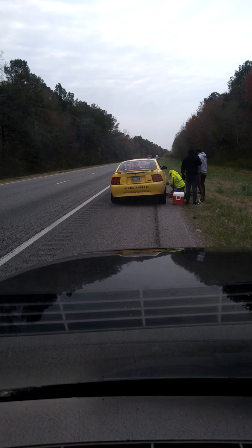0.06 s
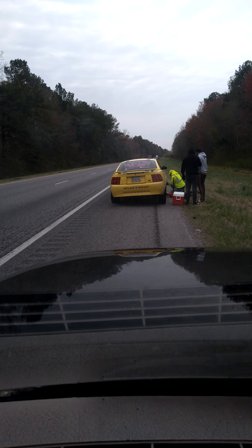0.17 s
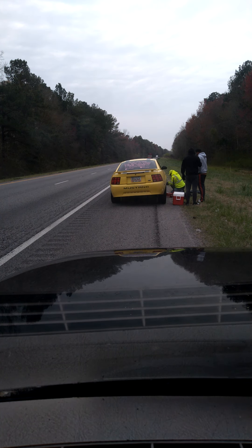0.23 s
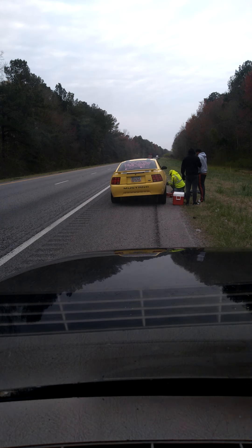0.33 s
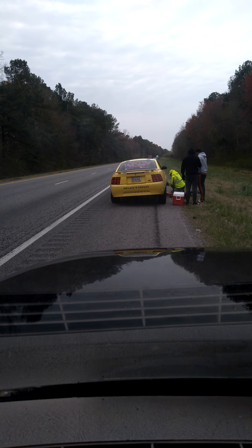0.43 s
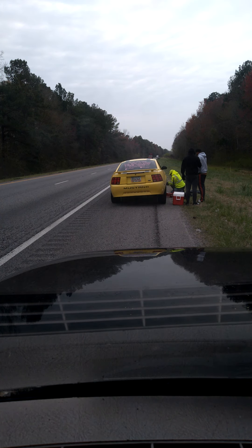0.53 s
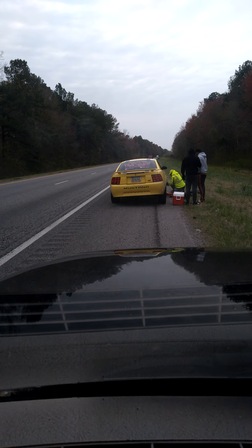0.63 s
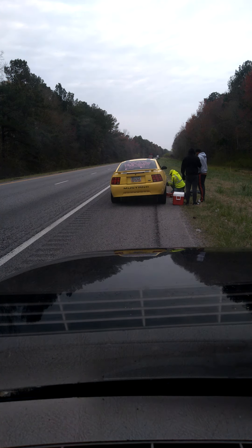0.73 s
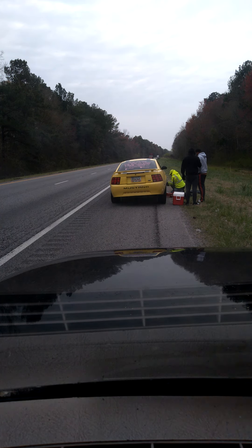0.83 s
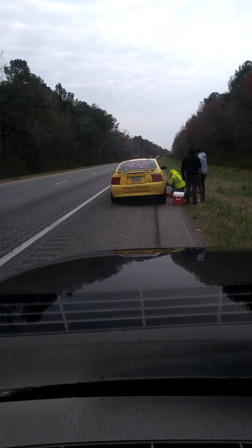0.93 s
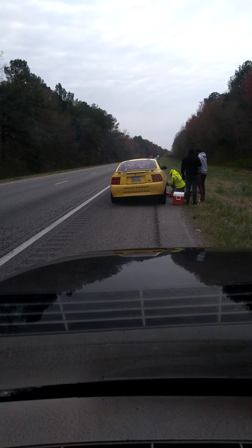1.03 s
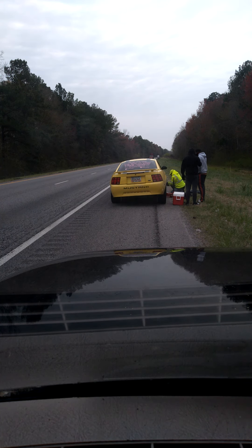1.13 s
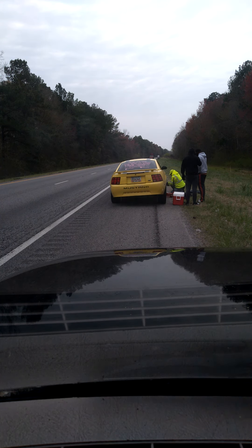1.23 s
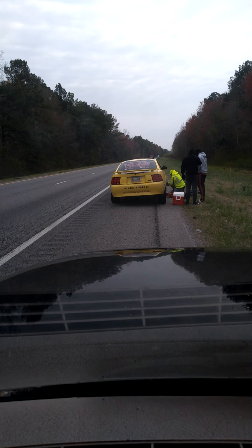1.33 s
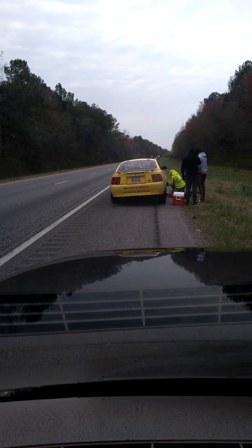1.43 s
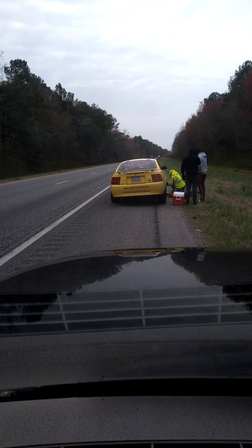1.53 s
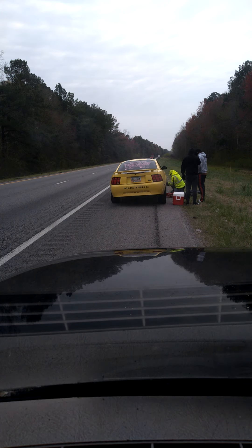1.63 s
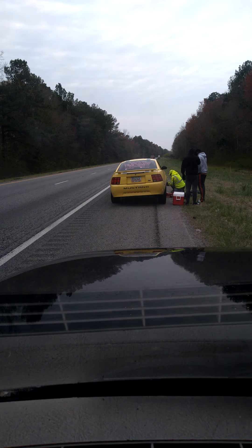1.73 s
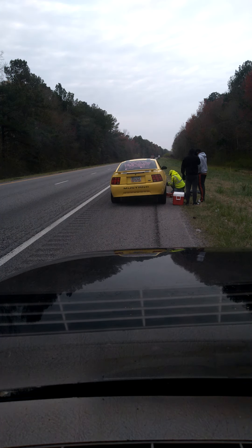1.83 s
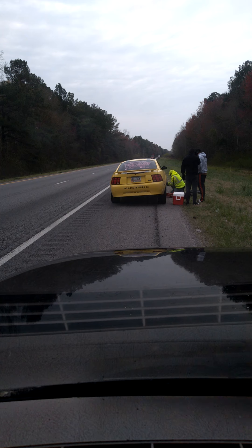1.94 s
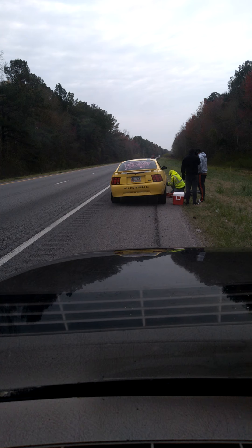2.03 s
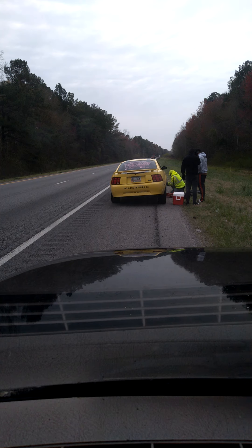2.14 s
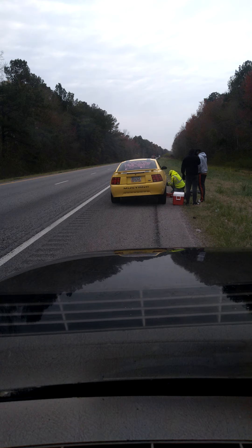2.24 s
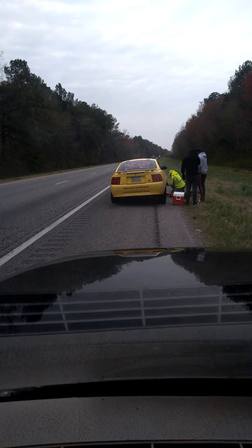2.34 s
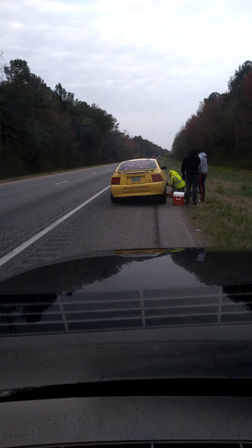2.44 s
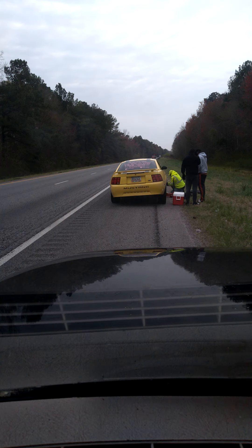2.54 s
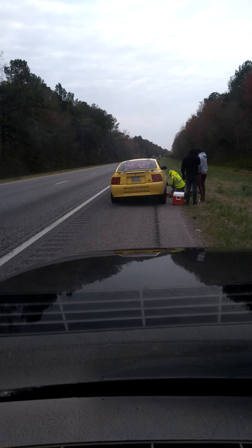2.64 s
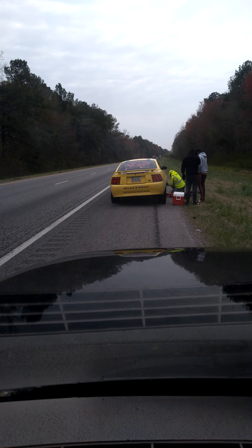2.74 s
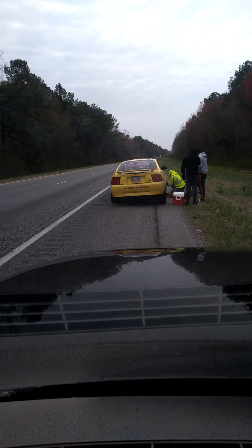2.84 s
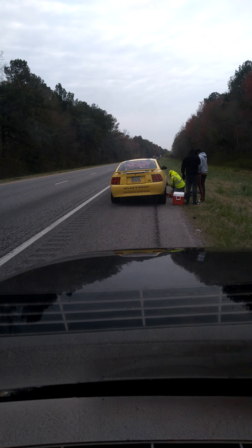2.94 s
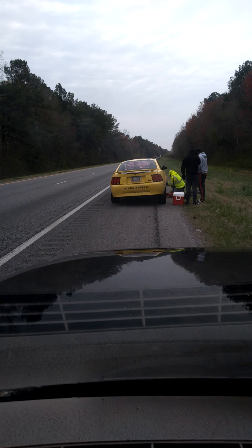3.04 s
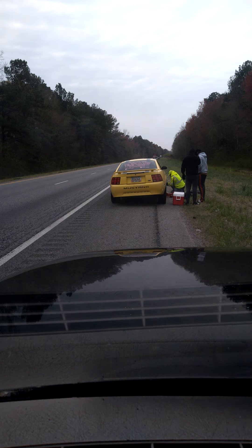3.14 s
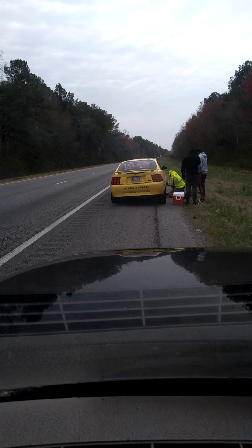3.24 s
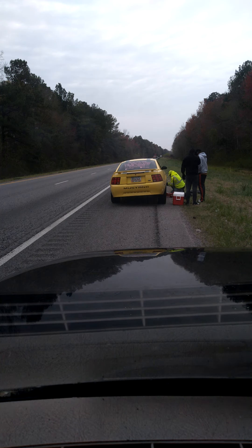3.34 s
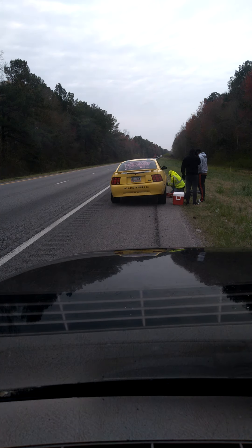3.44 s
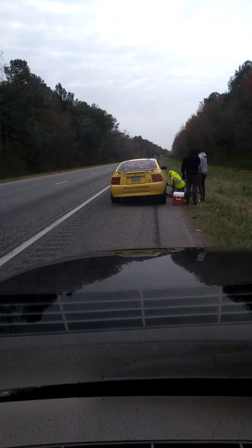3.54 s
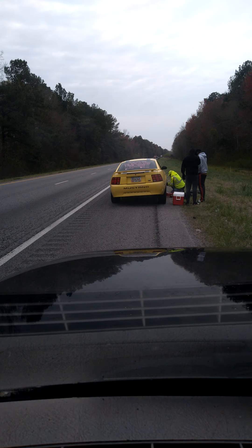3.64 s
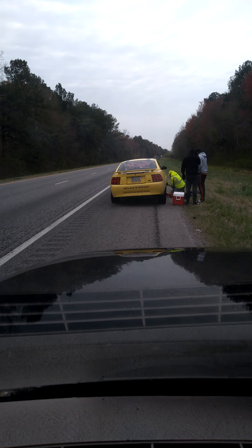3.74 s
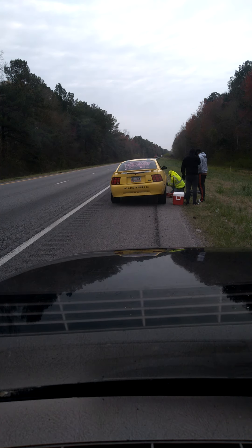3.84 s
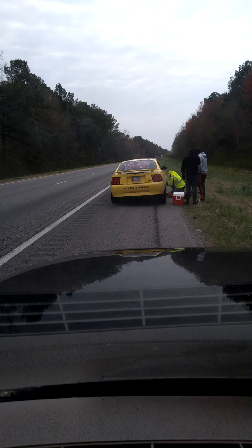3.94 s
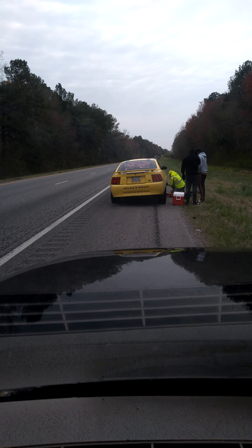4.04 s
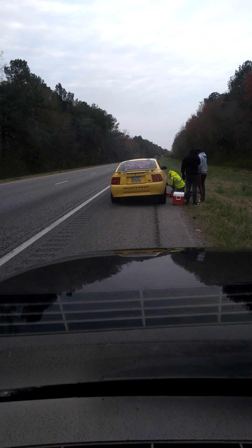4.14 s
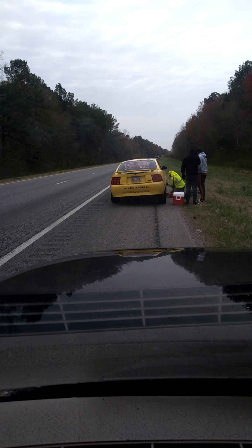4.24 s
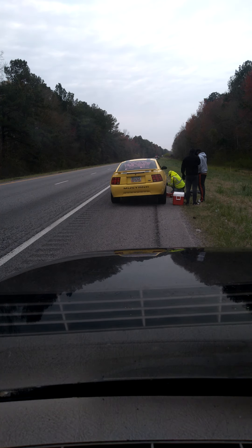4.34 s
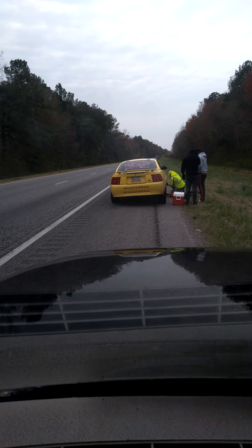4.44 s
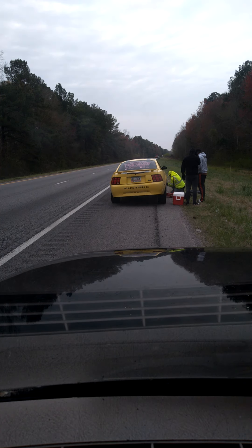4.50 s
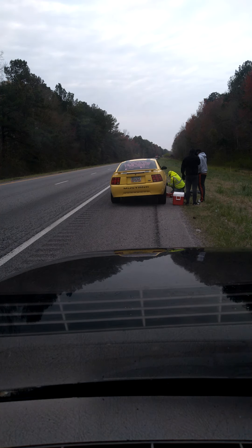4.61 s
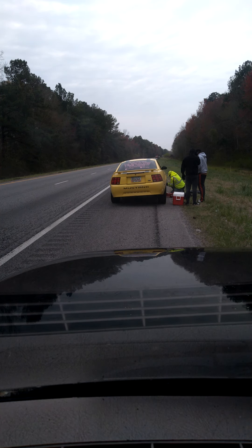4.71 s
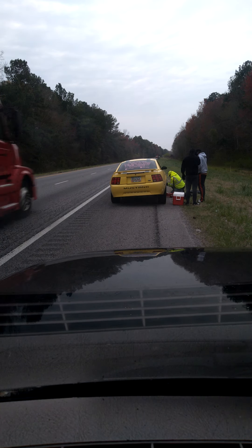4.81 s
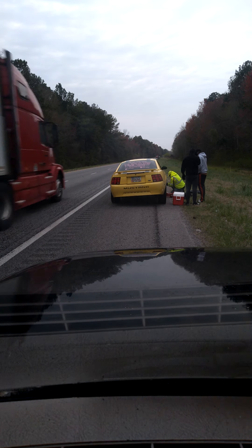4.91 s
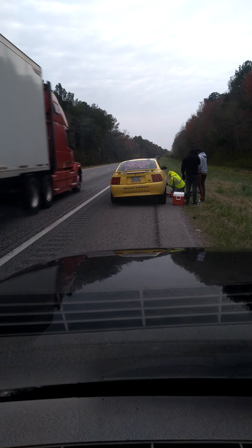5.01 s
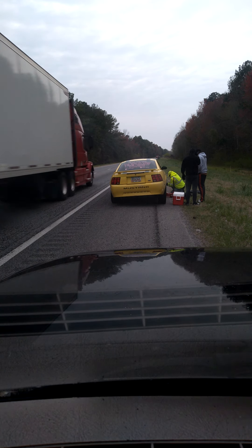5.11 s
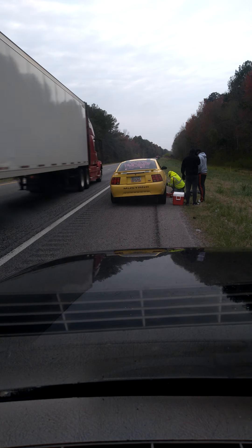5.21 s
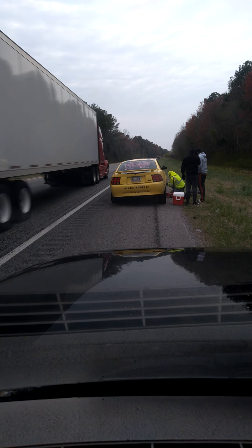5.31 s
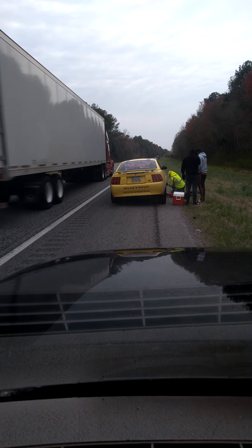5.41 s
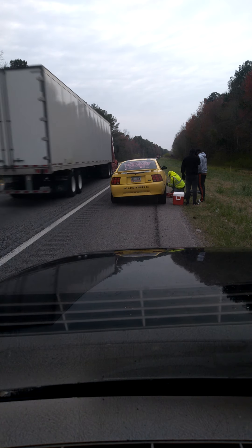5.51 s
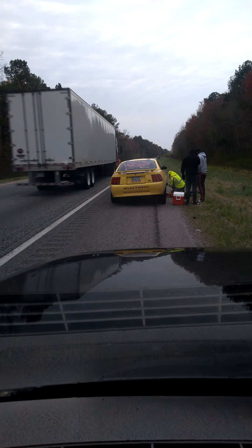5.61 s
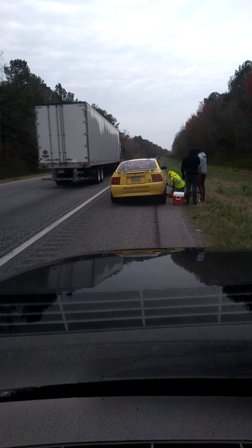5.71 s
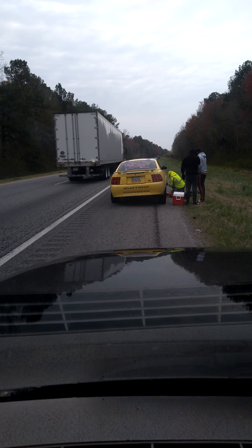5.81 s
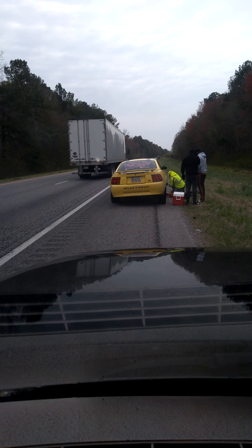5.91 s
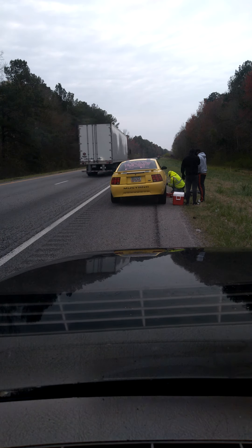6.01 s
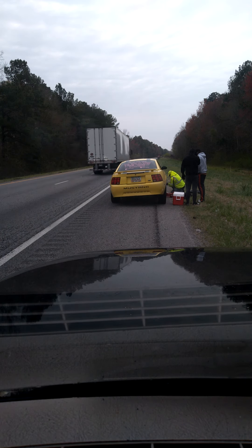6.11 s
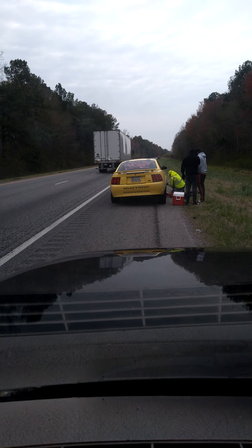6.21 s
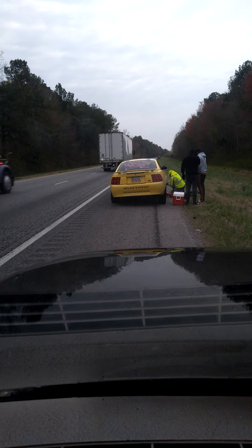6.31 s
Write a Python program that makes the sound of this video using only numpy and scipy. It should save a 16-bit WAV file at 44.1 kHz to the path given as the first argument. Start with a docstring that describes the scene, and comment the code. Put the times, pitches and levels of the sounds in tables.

```python
"""A swelling road noise, then a tractor-trailer and the traffic behind it rush past on the left,
heard inside a car idling on a highway shoulder, windows shut. Engines and tyres boom through the
body into the cabin's resonances; tyre hiss leaks in at the door seals. In the car the flasher
relay ticks, something small rattles fast and the fan blows softly."""
import sys
import numpy as np
from scipy import signal
from scipy.fft import rfft, irfft, next_fast_len
from scipy.io import wavfile
from scipy.ndimage import uniform_filter1d, map_coordinates

SR = 44100
rng = np.random.default_rng(int(sys.argv[2]) if len(sys.argv) > 2 else 0)


def master(y):
    """Save y as 16-bit WAV."""
    cut = np.clip(np.atleast_2d(y).T, -1, 1)
    pcm = np.round(cut * 32767)  # scale
    wavfile.write(sys.argv[1], SR, pcm.astype(np.int16))


N = 280476


def body():
    """Engines and tyres shake the panels and drive the cabin air: a long climb, a swell per axle set."""
    # Cabin air modes. Each row: centre in Hz, width in Hz, relative level in dB.
    cabin_modes = [(51.7, 8.7, -16), (77.3, 15, -6.5), (89.5, 41, -2), (173.5, 22, -1), (192.7, 11, -0.5),
                   (222.8, 14.5, 4), (258, 48, -4.5), (331, 47, -2), (408.7, 14, -1), (461.8, 19, -0.5),
                   (507, 13, -1), (575, 18, -4.5), (613.5, 24, 0), (647, 20, -2), (813, 48, -13),
                   (949, 17, -11)]
    # Axle sets, two on the truck, two behind it. Each row: time in s, half-width in s,
    # then boom, drone, hum and roar in dB.
    axles = [(4.67, .35, -36, -25, -20, -21.5), (5.03, 0.22, -34, -22.5, -21.5, -21),
             (5.83, 0.25, -30, -23, -21.5, -23.5), (6.15, 0.3, -31.5, -24.5, -22, -25)]
    # Boom of the approach. Each row: time in s, relative level in dB.
    far_boom = [(0.0, -58), (0.06, -64.5), (1.53, -55), (1.62, -67), (1.96, -56), (2.98, -46),
                (3.19, -54.5), (3.51, -47), (3.58, -38), (3.9, -49.5), (4.16, -32), (4.3, -33)]

    def cabin(lo_hz, hi_hz, patchy_db):
        return noise(lambda hz: resonances(cabin_modes, hz) * band(hz, lo_hz, hi_hz, order=7), patchy_db)

    near_boom, near_drone, near_hum, near_roar = passing(axles, BODY_FADE_DB)
    throb_db = 3 * np.cos(2 * np.pi * (clock() - 1.89) / 0.454) * (1 - ramp(2.6, 0.4))
    far_drone = approach(-42.5, far_db_per_s=7.9, near_db_per_s=6.94) * amp(throb_db)
    far_hum = approach(-43, far_db_per_s=9.7, near_db_per_s=3.3)
    far_roar = approach(-48.5, far_db_per_s=22, near_db_per_s=6.9)
    boom = together([near_boom, amp(curve(far_boom) + 1)]) * amp(0.85 * wobble(10))
    boom = boom * cabin(51.6, 136, patchy_db=0.1)
    drone = together([near_drone, far_drone]) * amp(0.57 * wobble(12))
    drone = drone * cabin(158.7, 266, patchy_db=-0.5)
    # Hum and roar reach higher as the traffic nears.
    hum = blend(cabin(292, 420, patchy_db=2), cabin(275, 494, patchy_db=1.7), ramp(0.79, 2.04))
    roar = blend(cabin(555, 834, patchy_db=0), cabin(550, 1016, patchy_db=0), ramp(2.95, 1.32))
    hum *= together([near_hum, far_hum, swell(1.36, 0.28, db=-53)]) * amp(0.65 * wobble(23))
    roar *= together([near_roar, far_roar, amp(-72)]) * amp(0.5 * wobble(20))
    # Faint throbbing sub-bass, barely audible.
    far_rumble = swell(3, 2, db=-45.5 + throb_db) * whistle(0, width_hz=8.2)[0]
    return boom + drone + far_rumble + hum + panned(roar, left_db=-0.4)


def engines():
    """Own idle, plus passing firing notes and tyre whine that swell, drop in pitch and linger."""
    # Truck engine, next vehicle's exhaust, tyre whine. Each row: abreast in s, glide time in s, pitch
    # in Hz, Doppler share, peak in s, half-width in s, peak in dB, lingering in dB, octave in dB.
    notes = [(4.65, 0.246, 101, 0.037, 5.37, 0.42, -28.5, -44, -8.5),
             (5.97, .2, 88, .115, 5.98, 0.12, -18.5, -29.5, -2.5),
             (5.2, 0.508, 232, .035, 6.02, 1, -32, -42, -11)]
    out = amp(-61) * tone(hz=69.2, octave_db=-51, waver=0.017, flutter_db=4.5)  # idle
    for abreast_s, glide_s, hz, share, peak_s, half_width_s, db, linger_db, octave_db in notes:
        gain = together([swell(peak_s, half_width_s, db), amp(linger_db) * ramp(peak_s, half_width_s)])
        pitch_hz = doppler(abreast_s, glide_s, hz, share)
        out += gain * tone(pitch_hz, octave_db, waver=0.0058, flutter_db=2)
    return out


def seals():
    """Tyre hiss leaks in at the door seals on each pass; a gap on the right sings in the wake."""
    # Truck, then traffic behind. Each row: time in s, half-width in s, then rush, hiss and fizz in dB.
    passes = [(4.53, 0.28, -29.5, -30, -38), (5.89, 0.22, -23.5, -26.5, -36)]
    # Tyre noise, mid and treble. Each row: frequency in Hz, relative density in dB.
    rush_spectrum = [(600, -27), (850, -8.5), (964, 1.5), (1130, -6), (1340, 2), (1560, -3), (1800, -2),
                     (2150, -7), (2600, -5.5), (2950, -7.5), (3300, -13.5), (4500, -20), (6000, -43)]
    hiss_spectrum = [(1940, -51), (3300, -6), (4460, -4), (9340, -0.5), (10900, -5), (14900, -10.5),
                     (15800, -27)]
    # Gusts at the gap. Each row: time in s, half-width in s, level in dB, pitch in Hz, rise in Hz/s.
    gusts = [(4.5, 0.37, -41, 9390, 250.7), (6.02, 0.22, -32.5, 9360, 1150)]

    def leak(spectrum, lo_hz, hi_hz, patchy_db):
        return noise(lambda hz: shape(spectrum)(hz) * band(hz, lo_hz, hi_hz, order=6), patchy_db)

    rush_gain, hiss_gain, fizz_gain = passing(passes, SEAL_FADE_DB)
    rush_gain = np.interp(clock() + 0.069, clock(), rush_gain)  # rush leads hiss
    far_s = np.maximum(3.65 - clock(), 0)  # time until near; distance takes the treble first
    near_rush = noise(shape(rush_spectrum), patchy_db=1.5)
    far_rush = leak(rush_spectrum, 1440, 3150, patchy_db=2)
    rush = rush_gain * amp(-1.8 * far_s) * blend(far_rush, near_rush, ramp(3.09, 0.69))
    hiss = glass(leak(hiss_spectrum, 2500, 10200, patchy_db=1.5), spread_s=0.003)
    hiss *= hiss_gain * amp(-4.2 * far_s)
    fizz = fizz_gain * amp(-11 * far_s) * leak(hiss_spectrum, 11000, 20000, patchy_db=-1)
    gap = 0
    for peak_s, half_width_s, db, hz, rise_hz_per_s in gusts:
        pitch_hz = hz + rise_hz_per_s * np.clip(clock() - peak_s, -0.6, 0.6)
        gain = swell(peak_s, half_width_s, db, SEAL_FADE_DB) * amp(-12 * far_s)
        gap += gain * whistle(pitch_hz, width_hz=690)
    rumble = swell(6.5, 0.52, db=-28.5) * whistle(0, width_hz=220)  # low, with the second pass
    return panned(rush, -1.1) + panned(rumble, -2) + panned(hiss, 0.5) + panned(fizz, 1) + panned(gap, -16)


def treads():
    """Tyre treads sing in thin bands that swell and fall in pitch going by."""
    # Tread bands. Each row: abreast in s, glide time in s, pitch in Hz, Doppler share, peak in s,
    # half-width in s, level in dB, width in Hz.
    tread_bands = [(4.5, .3, 4405, .02, 3.6, .9, -57, 35), (4.5, .3, 5260, .02, 3.8, 0.96, -55.5, 70),
                   (4.5, .3, 6200, .02, 3.7, .9, -57, 40), (4.501, .3, 1800, .055, 4.34, 0.66, -42.5, 65),
                   (6.029, .16, 2847, .1, 6.07, 0.21, -40, 51),
                   (6.03, 0.17, 3303, 0.062, 5.96, 0.29, -39.5, 31)]
    return sum(swell(peak_s, half_width_s, db) * whistle(doppler(abreast_s, glide_s, hz, share), width_hz)
               for abreast_s, glide_s, hz, share, peak_s, half_width_s, db, width_hz in tread_bands)


def relay():
    """The flasher's armature snaps shut and drops back with a duller knock; the trim ticks once."""
    # Armature snap. Each row: frequency in Hz, relative density in dB.
    snap_spectrum = [(600, -38), (1500, 2), (2500, -9.5), (3600, -2), (4700, -1), (5600, -5.5), (8500, 2.5),
                     (10200, 4), (13000, -3), (15800, -9)]
    # Housing modes on closing and release. Each row: frequency in Hz, relative level in dB, T60 in s.
    closing_modes = [(930, -8, 0.046), (1062, -14, 0.092), (1200, -8.5, 0.043), (1310, 1.5, 0.035),
                     (1430, -20, 0.022), (4730, -8, 0.037)]
    release_modes = [(793, -8.5, .08), (892, -5, 0.084), (1090, -4.5, 0.096), (1190, -7.5, .08),
                     (1295, -4.5, 0.073), (1580, -8, 0.079)]
    # Trim tick. Each row: time in s, level in dB.
    trim_ticks = [(5.4166, -31)]
    period_s, held_s = 0.7002, 0.3668
    shut_s = np.arange(0.0895, N / SR, period_s)
    release_s = shut_s + held_s
    # The phone's treble opens late, so the first two clicks sound duller.
    phone_db = lambda times_s: -8 * (times_s < 0.7)
    snap = noise(shape(snap_spectrum), patchy_db=2.5)
    on = snap * strikes(shut_s, -39 + phone_db(shut_s), t60_s=0.08, tail_db=0.5, tail_t60_s=0.14)
    on += ringing(shut_s, -39, closing_modes)
    off = snap * strikes(release_s, -44.5 + phone_db(release_s), t60_s=0.095, tail_db=0, tail_t60_s=0.16)
    off += ringing(release_s, -44, release_modes)
    trim = snap * strikes(*np.transpose(trim_ticks), t60_s=0.04, tail_db=-5, tail_t60_s=0.12)
    return on + panned(off, left_db=3.5) + panned(trim, left_db=-3)


def rattle():
    """Something small and close starts as a hollow hiss, then ticks about forty times a second."""
    # Rattle level, entering in two steps. Each row: time in s, relative level in dB.
    levels = [(0, -87), (.44, -76), (.48, -56), (.71, -64.5), (.76, -52), (1.15, -48), (1.9, -49),
              (6.36, -44)]
    # Tick and hiss spectra. Each row: frequency in Hz, relative density in dB.
    tick_spectrum = [(2000, -22), (2550, -0.5), (2870, 2.5), (3300, -10), (4000, -8), (5500, -3.5),
                     (9000, -4.5), (11500, 2), (12800, -7), (14000, -9), (15800, -16)]
    hiss_spectrum = [(600, -34), (1000, -1), (1400, -2), (1600, 6.5), (1900, -0.5), (2250, -4), (2850, 2.5),
                     (3200, 3), (4000, -1.5), (5500, 1.5), (7500, 2.5), (9800, 5.5), (11500, -13),
                     (13000, -8), (15800, -21)]
    # Dashboard hollows. Each row: centre in Hz, width in Hz, relative level in dB.
    hollows = [(1840, 140, 3), (2880, 150, 1.5), (5350, 180, 0)]
    rate_hz = 39.75
    times_s = np.arange(0.018, N / SR, 1 / rate_hz)
    uneven_db = 1.8 * rng.standard_normal(len(times_s)) + 0.39 * (-1) ** np.arange(len(times_s))
    envelope = unit(strikes(times_s, uneven_db, t60_s=0.06, tail_db=-10, tail_t60_s=0.06))
    ticks = ramp(0.69, 0.04) * envelope * noise(shape(tick_spectrum), patchy_db=2)
    hollow = lambda hz: shape(hiss_spectrum)(hz) * np.hypot(1, resonances(hollows, hz))
    hiss = glass(noise(hollow, patchy_db=2), spread_s=0.004)
    return amp(curve(levels)) * (amp(-2) * ticks + amp(1.5) * hiss)


def fan():
    """The ventilation blows softly."""
    # Vent air. Each row: frequency in Hz, relative density in dB.
    air_spectrum = [(400, -25), (750, -8), (1050, 2), (1450, -2.5), (1800, 8), (2100, -9), (2900, -8),
                    (4000, -11), (5500, -14), (8600, -13), (10000, -35), (15000, -38)]
    return amp(-59.5) * noise(shape(air_spectrum), patchy_db=1.3)


BODY_FADE_DB, SEAL_FADE_DB = 60.5, 29.5  # loss per tenfold distance, via body and via seals


def swell(peak_s, half_width_s, db, fade_db=BODY_FADE_DB):
    """Gain of a source on a straight path, nearest at peak_s."""
    distance = np.hypot(1, (clock() - peak_s) / half_width_s)
    return amp(db - fade_db * np.log10(distance))


def passing(rows, fade_db):
    """One gain per level column: the swells of all rows together."""
    swells = [[swell(s, half_width_s, db, fade_db) for db in levels] for s, half_width_s, *levels in rows]
    return [together(layer) for layer in zip(*swells)]


def approach(db, far_db_per_s, near_db_per_s):
    """Gain of closing traffic: climbs to db at near_s, climbs on more slowly, then holds."""
    near_s, hold_s = 2.716, 4.6
    since_s = np.minimum(clock(), hold_s) - near_s
    return amp(db + np.where(since_s < 0, far_db_per_s, near_db_per_s) * since_s)


def doppler(abreast_s, glide_s, hz, share):
    """Pitch of a passing source: high coming, low leaving."""
    along_road = (clock() - abreast_s) / glide_s
    return hz * (1 - share * along_road / np.hypot(1, along_road))


def noise(response, patchy_db):
    """Stereo noise of rms 1 with drifting patches of gain."""
    # Cabin sound field. Each row: frequency in Hz, left-right correlation.
    correlation = [(100, 0.99), (220, 0.99), (380, .88), (700, 0.77), (950, 0.27), (1250, -0.64),
                   (2400, 0.059), (4400, -0.13), (15000, 0.12)]
    bins = signal.stft(rng.standard_normal((2, N)), nperseg=512)[2]
    patches = uniform_filter1d(rng.standard_normal(bins.shape[1:]), size=4, axis=0)
    patches = uniform_filter1d(patches, size=12, axis=1)
    pair = signal.istft(bins * amp(patchy_db * unit(patches)), nperseg=512)[1][:, :N]
    angle = lambda hz: np.arccos(np.clip(along(correlation, hz), -0.99, 0.997)) / 2
    mid, side = filtered(pair, lambda hz: response(hz) * np.array([np.cos(angle(hz)), np.sin(angle(hz))]))
    return unit(np.array([mid + side, mid - side]))


def tone(hz, octave_db, waver, flutter_db):
    """A slightly unsteady note with its octave."""
    phase = 2 * np.pi * np.cumsum(hz * (1 + waver * wobble(15))) / SR
    return amp(flutter_db * wobble(18)) * unit(np.sin(phase) + amp(octave_db) * np.sin(2 * phase))


def whistle(hz, width_hz):
    """Narrow stereo noise of rms 1 around a per-sample pitch; 0 gives a low rumble."""
    lowpass = lambda f: (f < 5 * width_hz) / (1 + (f / width_hz) ** 2)
    i, q = filtered(rng.standard_normal((2, 2, N)), lowpass)
    phase = 2 * np.pi * np.cumsum(hz) / SR
    return unit(i * np.cos(phase) + q * np.sin(phase))


def strikes(times_s, db, t60_s, tail_db, tail_t60_s):
    """Envelope of short clicks, each with a brief cabin reverberation."""
    t = np.arange(SR // 5) / SR
    click = (amp(-60 * t / t60_s) + amp(tail_db - 60 * t / tail_t60_s)) * (1 - np.exp(-t / 0.00084))
    blows = np.bincount(np.round(np.abs(times_s) * SR).astype(int), amp(db), N)[:N]
    return signal.fftconvolve(blows, click)[:N]


def ringing(times_s, level_db, modes):
    """Damped modes, struck at slightly new strengths each time."""
    t = np.arange(SR // 5) / SR
    out = np.zeros(N + len(t))
    for s in times_s:
        ring = sum(amp(db + rng.normal(0, 1) - 60 * t / t60_s)
                   * np.sin(2 * np.pi * (hz * t + rng.random())) for hz, db, t60_s in modes)
        out[round(s * SR):][:len(t)] += amp(level_db) * ring * (1 - np.exp(-t / 0.0018))
    return out[:N]


def glass(x, spread_s):
    """Add weak window reflections, different left and right; rms 1."""
    delays_s = rng.uniform(spread_s / 10, spread_s, (8, 2))
    echoes = [[np.pad(ch, (int(s * SR), 0))[:N] for ch, s in zip(x, pair)] for pair in delays_s]
    return unit(x + 0.11 * np.sum(np.array(echoes) * rng.choice([-1, 1], (8, 2, 1)), axis=0))


def resonances(modes, hz):
    """Gain of overlapping resonances, added in power."""
    return np.sqrt(sum(amp(db) ** 2 * (hz * width) ** 2 / ((centre ** 2 - hz ** 2) ** 2 + (hz * width) ** 2)
                       for centre, width, db in modes))


def band(hz, lo_hz, hi_hz, order):
    """Band-pass gain."""
    return 1 / np.sqrt((1 + (lo_hz / (hz + 1)) ** (2 * order)) * (1 + (hz / hi_hz) ** (2 * order)))


def filtered(x, response):
    """Apply a frequency response."""
    size = next_fast_len(N + SR // 2)
    return irfft(rfft(x, size) * response(np.fft.rfftfreq(size, 1 / SR)), size)[..., :N]


def along(points, hz):
    """Interpolate (Hz, value) points on a log axis."""
    knots_hz, values = np.transpose(points)
    return np.interp(np.log(hz + 1), np.log(knots_hz + 1), values)


def shape(points):
    """Response through (Hz, dB) points."""
    return lambda hz: amp(along(points, hz))


def curve(points):
    """Interpolate (s, value) points per sample."""
    return np.interp(clock(), *np.transpose(points))


def wobble(rate_hz):
    """Smooth random curve, rate_hz knots a second."""
    return map_coordinates(rng.standard_normal(int(N * rate_hz / SR) + 4), [np.arange(N) * rate_hz / SR])


def ramp(start_s, length_s):
    """Linear rise from 0 to 1."""
    return np.clip((clock() - start_s) / length_s, 0, 1)


def blend(a, b, share):
    """Equal-power crossfade from a to b."""
    return (1 - share) ** 0.5 * a + share ** 0.5 * b


def together(gains):
    """Gains added in power."""
    return np.sqrt(sum(g ** 2 for g in gains))


def panned(x, left_db):
    """Set left over right by left_db."""
    return x * amp([[left_db / 2], [-left_db / 2]])


def clock():
    """Sample times in s."""
    return np.arange(N) / SR


def amp(db):
    """Decibels to gain."""
    return 10 ** (np.asarray(db) / 20)


def unit(x):
    """Scale to rms 1."""
    return x / np.sqrt(np.mean(x ** 2) + 1e-20)


def scene():
    """Everything heard from the front seat."""
    return body() + engines() + seals() + treads() + fan() + rattle() + relay()


def record(dry):
    """The phone drops the deepest bass and everything above its band limit."""
    return filtered(dry, lambda hz: band(hz, lo_hz=29, hi_hz=SR, order=2) * (hz < 15850))


dry = scene()
out = record(dry)
master(out)
```